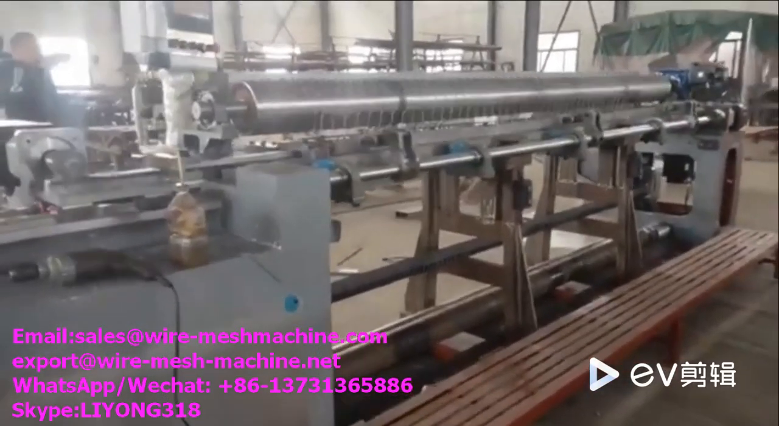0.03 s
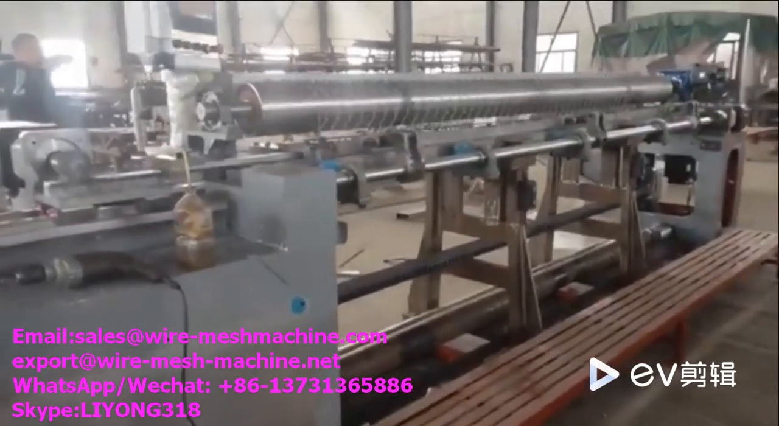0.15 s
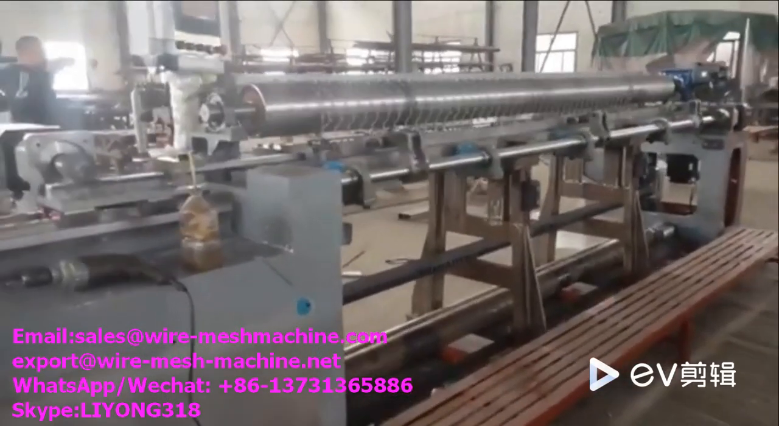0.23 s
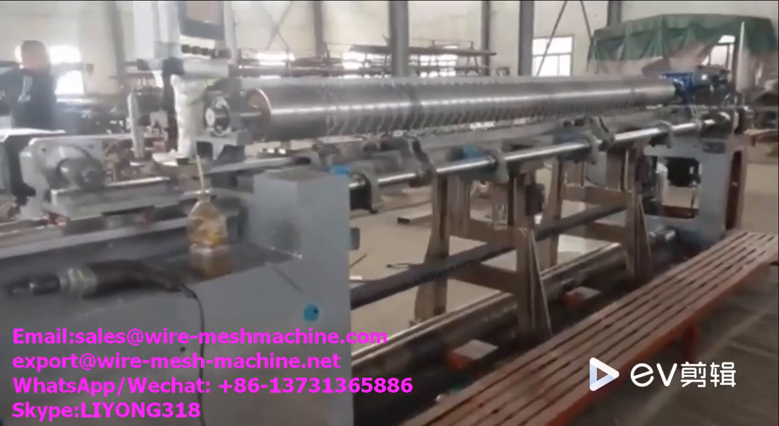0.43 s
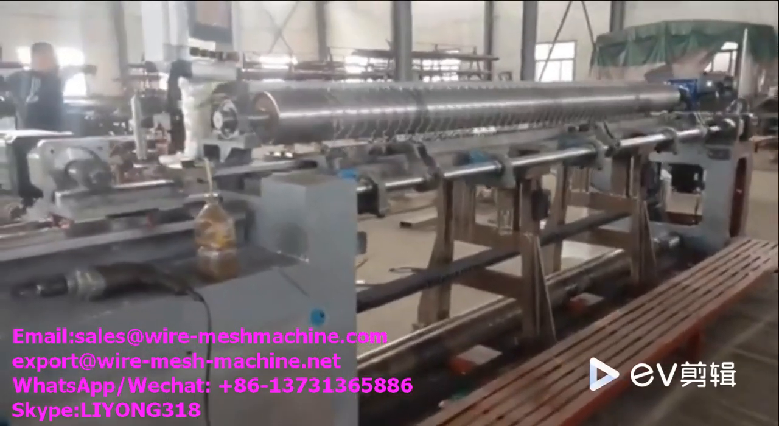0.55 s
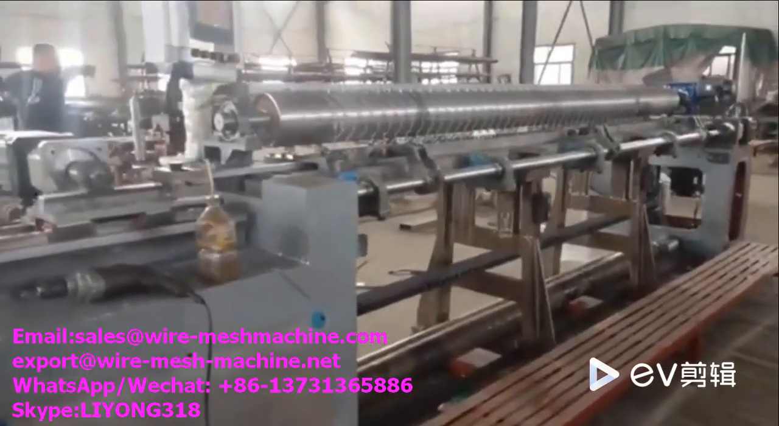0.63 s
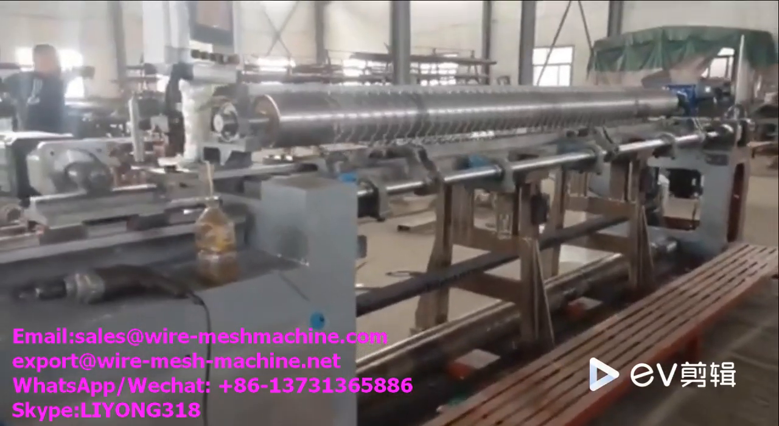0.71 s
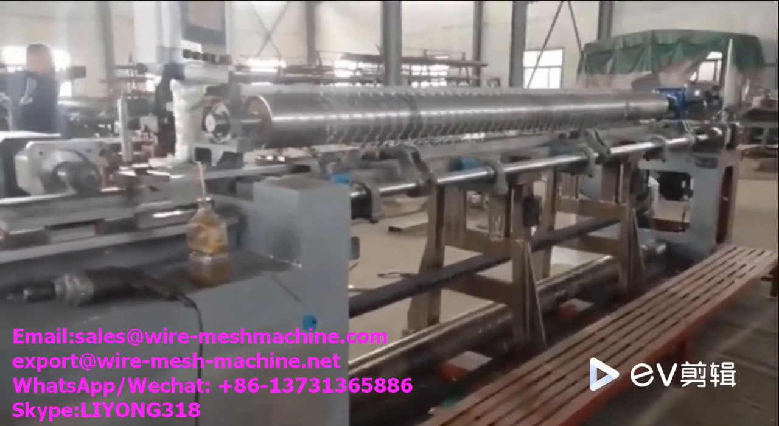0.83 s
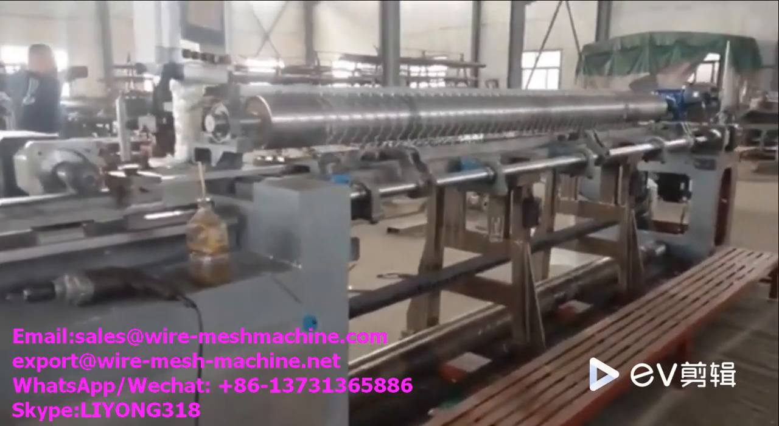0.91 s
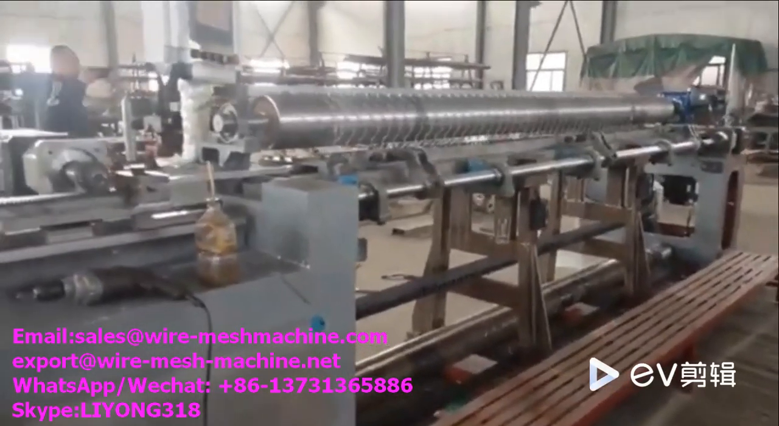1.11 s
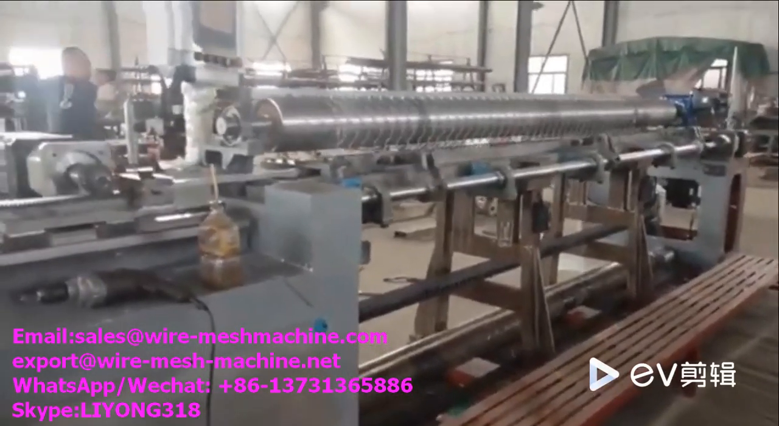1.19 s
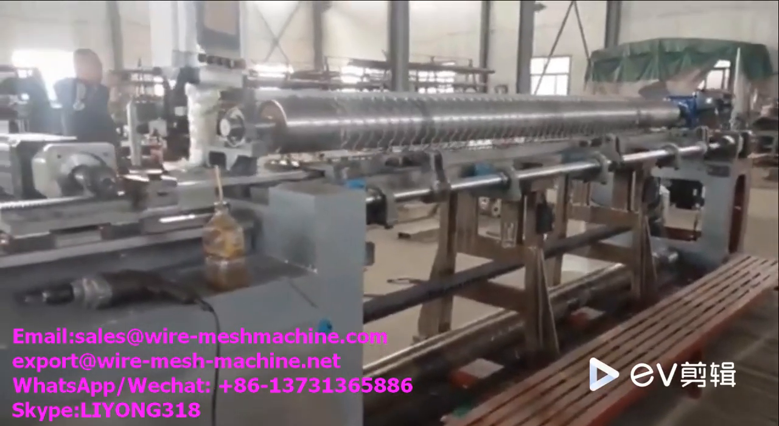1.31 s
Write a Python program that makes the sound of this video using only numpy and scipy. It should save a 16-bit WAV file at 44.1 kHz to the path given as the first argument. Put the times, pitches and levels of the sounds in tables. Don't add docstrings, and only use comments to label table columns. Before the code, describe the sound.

A pneumatic valve on a wire machine leaks, whistles briefly, then blasts rough hissing air until a piston thuds against metal. The hall rings over motor hum, and a lighter knock follows; phone microphone, dull patchy treble.

```python
import sys
import numpy as np
from scipy import signal
from scipy.fft import rfft, irfft, next_fast_len
from scipy.io import wavfile
from scipy.ndimage import uniform_filter1d, map_coordinates

SR = 44100
rng = np.random.default_rng(int(sys.argv[2]) if len(sys.argv) > 2 else 0)


def nominal_scale(level):
    x = np.asarray(level, float) / 20
    return 10 ** x


def bounce(signal):
    frames = np.transpose(np.atleast_2d(signal))
    limited = np.clip(frames, -1, 1)
    pcm = np.round(limited * 32767).astype(np.int16)
    wavfile.write(sys.argv[1], SR, pcm)


N = 59535


def unit(x):
    return x / np.sqrt(np.mean(x ** 2) + 1e-20)


def along(points, hz):
    f, v = np.transpose(points)
    return np.interp(np.log(hz + 1), np.log(f + 1), v)


def curves(rows):
    s, *cols = np.transpose(rows)
    return [np.interp(np.arange(N) / SR, s, c) for c in cols]


def wobble(rate_hz):
    return map_coordinates(rng.standard_normal(2000), [np.arange(N) * rate_hz / SR])


def swell(start_s, len_s):
    u = 2 * np.clip(np.arange(N) / SR - start_s, 0, None) / len_s
    return u * np.exp(1 - u)


def filtered(x, response):
    m = next_fast_len(N + SR // 2)
    return irfft(rfft(x, m) * response(np.fft.rfftfreq(m, 1 / SR)), m)[..., :N]


def resonances(table):
    def response(f):
        total = 0
        for k, (hz, width, db) in enumerate(table):
            damping = 1j * f * width
            total = total + (-1) ** k * nominal_scale(db) * damping / (hz * hz - f * f + damping)
        return total
    return response


def noise(spectrum):
    shut = [(spectrum[0][0] / 2, -90), *spectrum, (spectrum[-1][0] * 2, -120)]
    return unit(filtered(rng.standard_normal(N), lambda hz: nominal_scale(along(shut, hz))))


# pitch_hz [Hz], level_db [dB per Hz]
WASH_COLOUR = [(18, -48), (30, -15), (178, -8.5), (228, -6), (688, -11.5), (840, -7), (1160, -16),
               (6890, -31), (12000, -37), (15500, -96), (22000, -120)]
# pitch_hz [Hz], level_db [dB]
MOTOR_HUM = [(76, -59.5), (153, -55), (227, -57), (300, -54), (819, -59.5), (844, -57), (868, -60.5),
             (968, -59.5)]
# start_s [s], level_db [dB]
RUMBLE_LEVEL = [(0, -62), (.25, -51), (.4, -53), (.55, -57), (.62, -41.5), (.78, -53.5), (.92, -46),
                (1.05, -45), (1.15, -50.5), (1.35, -55)]
# pitch_hz [Hz], level_db [dB]
RUMBLE_COLOUR = [(25, -22), (48, 7), (78, 7.5), (160, -2.5), (330, 2.5), (500, -64)]


def shop():
    t = np.arange(N) / SR
    wash_db, hum_sway_db = -42 - 3.5, 1.5
    whine_hz, whine_width_hz, whine_db, whine_sway_db = 6810, 410, -60, 2.5
    wash = nominal_scale(wash_db + wobble(7.3)) * noise(WASH_COLOUR)
    hum = 0
    for hz, db in MOTOR_HUM:
        level = nominal_scale(db + hum_sway_db * wobble(11.7))
        hum = hum + level * np.sin(2 * np.pi * hz * t + wobble(6.43))
    whine = unit(filtered(rng.standard_normal(N), resonances([(whine_hz, whine_width_hz, 0)])))
    whine = whine * nominal_scale(whine_db + whine_sway_db * wobble(19.4))
    rumble_db, = curves(RUMBLE_LEVEL)
    rumble = nominal_scale(rumble_db + 0.76 * wobble(10.2)) * noise(RUMBLE_COLOUR)
    return wash + hum + whine + rumble


# pitch_hz [Hz], ring_s [s]
HALL_RING = [(100, 2.9), (500, 2.2), (1500, 3.07), (3000, 1.82), (6500, 1.26), (11000, 2.17)]


def hall(x):
    delay_s = .02
    hz, t, z = signal.stft(rng.standard_normal(N), SR, nperseg=256)
    fade = nominal_scale(-60 * t / along(HALL_RING, hz)[:, None])
    tail = signal.istft(z * fade, SR, nperseg=256)[1]
    late = np.pad(x, (round(delay_s * SR), 0))
    return signal.fftconvolve(late, tail / np.linalg.norm(tail))[:N]


# start_s [s], level_db [dB], bright_db [dB], length_s [s], pitch_hz [Hz]
BLOWS = [(.2, -47, -12, .012, 250), (.225, -43, -10, .012, 330), (.262, -44, -8, .012, 480),
         (.3, -44, -12, .014, 240), (.33, -45, -12, .012, 330), (.585, -31, -3, .007, 1650),
         (.595, -31, -6, .006, 520), (.603, -25, -14, .011, 310), (.642, -33, -10, .014, 220),
         (.666, -32, -12, .008, 310), (1.222, -43, 6, .012, 800), (1.24, -40, 4, .012, 430),
         (1.262, -43, 0, .01, 300)]
# pitch_hz [Hz], width_hz [Hz], level_db [dB]
FRAME = [(77, 40, -40), (152, 28, 5.5), (230, 14, -12), (286, 77, 2), (400, 83, 6), (597, 600, -3)]
# pitch_hz [Hz], width_hz [Hz], level_db [dB]
PLATE = [(810, 630, -3), (1650, 890, -1)]


def blows():
    t = np.arange(N) / SR
    ring_db, rattle_db, plate_db = 2, 12, 7
    tick_s, tick_hz, tick_db, tick_t60_s = 1.232, 4860, -44.5, 0.025
    low, high, ring = 0, 0, 0
    for start_s, db, bright_db, len_s, hz in BLOWS:
        push = nominal_scale(db) * swell(start_s, len_s)
        low = low + push
        high = high + push * nominal_scale(bright_db)
        ring = ring + push * np.sin(2 * np.pi * hz * (t - start_s))
    grit = rng.standard_normal((2, N))
    rattle = filtered(low * grit[0], resonances(FRAME))
    plate = filtered(high * grit[1], lambda hz: resonances(PLATE)(hz) / (1 + 1j * hz / 2500))
    tick_level = (t > tick_s) * nominal_scale(tick_db - 60 * np.abs(t - tick_s) / tick_t60_s)
    tick = tick_level * np.sin(2 * np.pi * tick_hz * t)
    return nominal_scale(ring_db) * ring + nominal_scale(rattle_db) * rattle + nominal_scale(plate_db) * plate + tick


# start_s [s], pitch_hz [Hz], level_db [dB]
WHISTLE = [(.183, 3350, -69), (.198, 3260, -36.5), (.212, 3290, -35), (.219, 3190, -23.5),
           (.224, 3256, -40.5), (.229, 3220, -24.5), (.238, 3215, -42), (.266, 3230, -38),
           (.281, 3174, -25)]


def whistles():
    t = np.arange(N) / SR
    waver_hz = 26.7
    hz, db = curves(WHISTLE)
    on = (t > WHISTLE[0][0]) * np.clip((WHISTLE[-1][0] - t) / 0.012 + 1, 0, 1)
    low_turns = np.cumsum(hz + waver_hz * wobble(146.8)) / SR
    low = on * nominal_scale(db) * np.sin(2 * np.pi * low_turns)
    upper_hz, from_s, to_s, upper_db = 6550, 0.1936, 0.2417, -41
    on = np.clip(np.minimum(t - from_s, to_s - t) / 0.0023, 0, 1)
    high_turns = np.cumsum(upper_hz + waver_hz * wobble(80)) / SR
    high = on * nominal_scale(upper_db + 0.96 * wobble(99)) * np.sin(2 * np.pi * high_turns)
    return np.sqrt(2) * (low + high)


# start_s [s], level_db [dB]
FLOW = [
    (.14, -102),
    (.15, -61),
    (.24, -45.5),
    (.29, -29.5),
    (.4, -24.5),
    (.55, -28.5),
    (.6, -29.5),
    (.68, -30.5),
    (.72, -79),
]
# pitch_hz [Hz], width_hz [Hz], level_db [dB]
PORT = [(1100, 147, -10), (1472, 120, -2.5), (1880, 460, -5), (3003, 273, 9), (3660, 750, -1.5),
        (4490, 250, -9.5), (6303, 1000, -2), (7310, 1110, -1.5), (9630, 2360, -12)]
# pitch_hz [Hz], level_db [dB]
JET = [(500, -47), (1100, 6), (3700, -6.5), (4100, -2.5), (4500, 5.5), (7600, -5), (9000, -6.5),
       (10500, -7)]
# pitch_hz [Hz], level_db [dB]
LEAK = [(4500, -32), (6000, -1.5), (8000, -8), (11500, -14)]
# pitch_hz [Hz], level_db [dB]
POP = [(4000, -6), (5800, -8), (7500, 1.5), (10000, -1), (12000, -12)]


def valve():
    t = np.arange(N) / SR
    eddy_hz, eddy_db = 178.4, 0.5
    leak_s, leak_rise_s, leak_db = .145, 0.0035, -50.5
    pop_s, pop_len_s, pop_db = 0.242, .022, -33
    flow_db, = curves(FLOW)
    jet = unit(filtered(noise(JET), resonances(PORT)))
    roar = jet * nominal_scale(flow_db + eddy_db * wobble(eddy_hz) + wobble(23.5))
    roar = roar * (t < FLOW[-1][0])
    leak_open = np.clip((t - leak_s) / leak_rise_s, 0, 1) * (t < FLOW[3][0])
    leak = nominal_scale(leak_db) * noise(LEAK) * leak_open
    pop = nominal_scale(pop_db) * noise(POP) * swell(pop_s, pop_len_s)
    return roar + leak + pop + whistles()


def scene():
    air, frame = valve(), blows()
    echo = hall(nominal_scale(-4.5) * air + nominal_scale(-4.5) * frame)
    return (air + frame + echo + shop())[None]


# pitch_hz [Hz], margin [spreads of chance]
TREBLE_MARGIN = [(3700, 4), (4000, .2), (5000, .6), (6200, 1.8), (7500, 1.8), (8300, -.3), (9400, -2.5),
                 (10000, -.2), (10600, -1.7), (11300, -.7), (12000, -1.5)]
# start_s [s], margin [spreads of chance]
SPARE_MARGIN = [(0, -0.056), (.13, -0.46), (.16, 0.53), (.2, 0.74), (.26, 0.21), (.33, 0.47), (.45, 0.9),
                (.52, -0.15), (.63, 0.78), (.68, 0.31), (.78, 0.079), (.95, 0.93), (1.08, 0.41),
                (1.24, -0.27), (1.35, -0.8)]


def patchy_treble(x):
    margin_per_db, hole_db, band_hz = .22, -55, 345
    hz, t, z = signal.stft(x[0], SR, nperseg=2048, noverlap=1536)
    power = np.abs(z) ** 2 + 1e-20
    nearby = np.abs(uniform_filter1d(power, size=15, axis=0))
    line_db = 10 * np.log10(power / nearby)
    luck = unit(uniform_filter1d(rng.standard_normal((80, len(t))), size=3, axis=1))
    chance = luck[(hz // band_hz).astype(int)]
    spare = np.interp(t, *np.transpose(SPARE_MARGIN)) * (hz > 7500)[:, None]
    score = chance + along(TREBLE_MARGIN, hz)[:, None] + spare + margin_per_db * line_db
    score[hz < TREBLE_MARGIN[0][0]] = 1
    holes = nominal_scale(hole_db * np.clip(.5 - 2 * score, 0, 1))
    return signal.istft(z * holes, SR, nperseg=2048, noverlap=1536)[1][None, :N]


def band_limit(x):
    return signal.sosfilt(signal.butter(12, 12110, fs=SR, output="sos"), x)


def record(dry):
    top_hz, notch_hz, notch_width_hz, notch_db = 12100, 4090, 190, -8

    def case(hz):
        notch = np.exp(-((hz - notch_hz) / notch_width_hz) ** 2)
        return (hz < top_hz) * nominal_scale(notch_db * notch)

    return band_limit(patchy_treble(filtered(dry, case)))


dry = scene()
out = record(dry)
bounce(out)
```